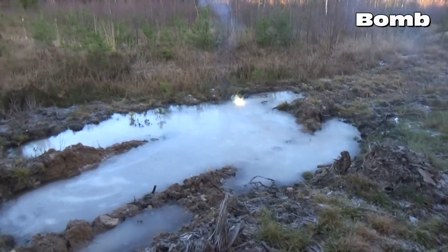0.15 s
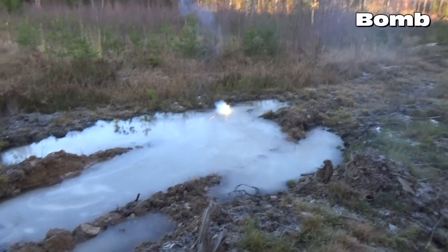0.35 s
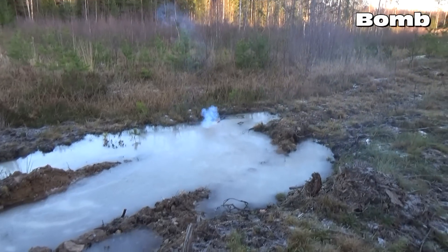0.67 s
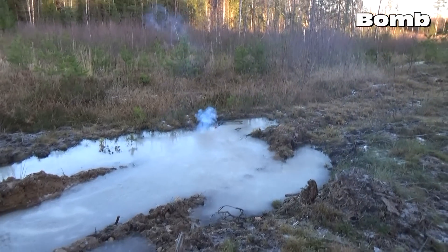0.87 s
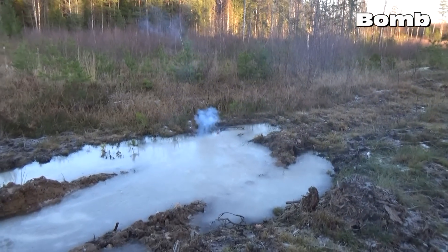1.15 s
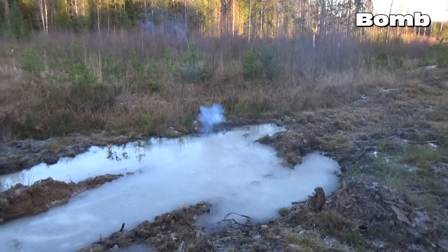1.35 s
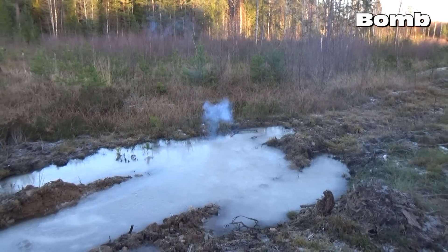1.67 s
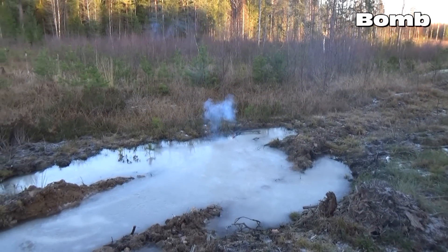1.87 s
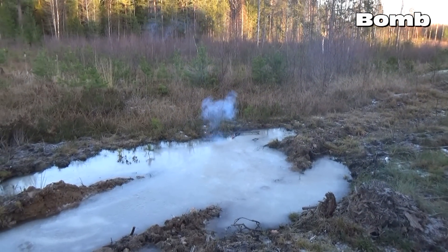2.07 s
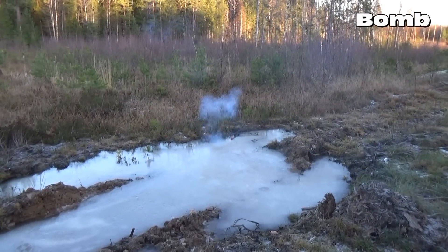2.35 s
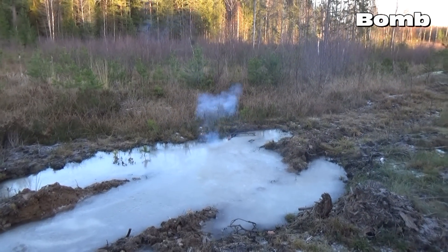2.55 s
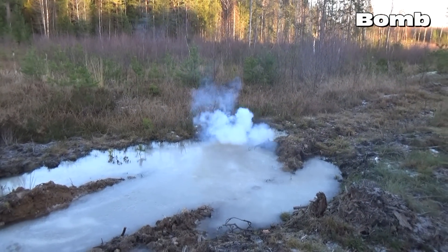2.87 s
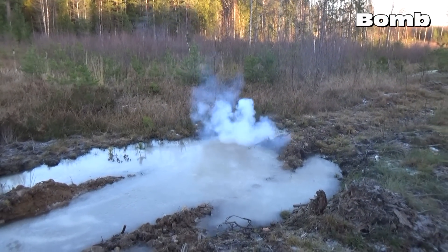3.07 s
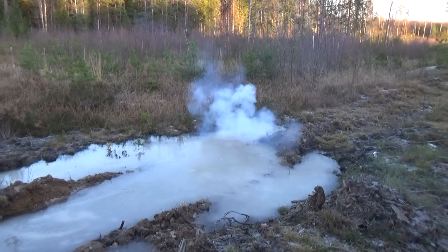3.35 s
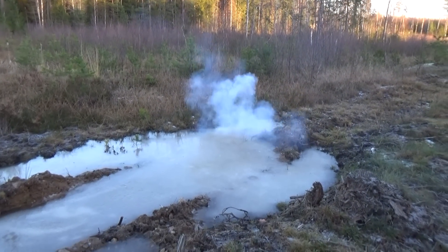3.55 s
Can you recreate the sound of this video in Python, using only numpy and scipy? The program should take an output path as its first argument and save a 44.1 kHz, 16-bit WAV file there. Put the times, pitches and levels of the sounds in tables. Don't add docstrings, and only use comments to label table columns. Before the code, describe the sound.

A firecracker sputters brightly at 0 s, quietens, then puffs low around 0.4 s. A sharp snap at 0.8 s starts a thin, high, flickering hiss, swelling near 2 s and easing, with a small pop at 2.45 s. At 2.75 s a very loud, distorted bang hits with a falling icy boom; crackle and a lumpy, left-drifting forest roll from 3 s sink until the end at 3.7 s.

```python
import sys
import numpy as np
from scipy import signal
from scipy.fft import rfft, irfft
from scipy.io import wavfile
from scipy.ndimage import uniform_filter1d

SR = 44100
rng = np.random.default_rng(int(sys.argv[2]) if len(sys.argv) > 2 else 0)


def persist_wave(psi):
    counts = np.round(np.clip(psi, -1, 1) * 32767).astype(np.int16)
    wavfile.write(sys.argv[1], SR, np.atleast_2d(counts).T)


def attenuation_scalar(level_db):
    decades = np.asarray(level_db, float) / 20
    return 10 ** decades


N = 163170

SHOCK_S, SHOCK_WIDTH_S, SHOCK_DB = 2.7502, 0.0003, 2
CRACK_DB, CRACK_S = 4, 0.0067
# frequency in Hz, likeness from 0 to 1.
BANG_LIKENESS = [(60, 0.72), (180, 0.65), (550, 1), (1650, 0.97), (4970, 0.78), (15000, 0.52)]
# frequency in Hz, level in dB per Hz.
DEBRIS_COLOUR = [(100, 13), (400, -12), (1500, 2), (4000, -5), (8000, -4.5), (15500, -16.5)]
# frequency in Hz, T60 in seconds.
DEBRIS_T60 = [(200, 1.05), (1500, 3), (5000, 1.76), (10000, 0.76), (15000, 0.67)]
DEBRIS_DB, DEBRIS_HOLD_S = -3, 0.1
BANK_S, BANK_WIDTH_S, BANK_DB = 2.868, 0.022, 3
# frequency in Hz, level in dB per Hz.
FOREST_COLOUR = [(47, -34), (80, -8), (107, -18), (185, -13.5), (754, -4.5), (1080, -8), (1330, -6),
                 (2200, -11.5), (6530, -31), (12000, -46.5), (15600, -74)]
# frequency in Hz, T60 in seconds.
FOREST_T60 = [(100, 3.1), (300, 140), (700, 7.3), (2000, 3.35), (5000, 1.8), (10000, 3)]
FOREST_S, FOREST_RISE_DB_PER_S, FOREST_DB = 2.986, 41, 2
FOREST_PAN_DB, FOREST_PAN_DB_PER_S = 1.5, 13
# time in seconds, level in dB.
ROLL_LEVEL = [
    (2.96, -15.5),
    (3.144, -4),
    (3.206, -11),
    (3.342, -8),
    (3.356, -9.5),
    (3.542, -10),
    (3.55, -10),
    (3.686, -13.5),
    (3.7, -11),
]
# time in seconds, width in seconds, lift in dB.
TREE_ECHOES = [(3.02, 0.011, 1.5), (3.055, 0.014, 5.5), (3.12, .02, 1), (3.16, .015, 0.5), (3.235, .012, 2),
               (3.28, 0.014, 2.5), (3.325, .02, 3), (3.44, .012, 1), (3.49, 0.013, 2), (3.53, .014, 1),
               (3.61, .01, 1.5), (3.667, 0.014, 4)]

# start in seconds, length in seconds, pitch in Hz,
# level in dB.
ICE_WAVES = [(2.727, 0.0084, 1250, -20), (2.7385, 0.007, 680, 3), (2.739, 0.0043, 1180, 1),
             (2.7465, 0.0065, 805, -5), (2.7435, 0.0071, 2500, -3.5), (2.7425, 0.0062, 160, -7),
             (2.743, 0.0076, 1540, -2.5), (2.751, 0.06, 305.5, 2), (2.778, 0.038, 245.4, -2),
             (2.80, 0.051, 196, 0.5), (2.81, 0.046, 151, -6), (2.815, 0.105, 307.3, -9),
             (2.77, 0.044, 133, -5), (2.885, 0.073, 190.4, -2), (2.90, 0.054, 124, -3.5),
             (2.968, 0.052, 118, -8), (3.055, 0.087, 110.3, -3.5), (3.11, 0.037, 123, -11),
             (3.17, 0.038, 108, -9.5), (3.27, 0.061, 104, -14.5), (3.33, .035, 110, -21),
             (3.385, 0.065, 112, -15)]
ICE_SAG, ICE_WOBBLE, ICE_FLUTTER_DB = 0.15, 0.11, 2
ICE_PAN_DB, ICE_LAG_RAD, PAN_FULL_HZ = 11, 0.81, 170
GRIT_S, GRIT_DB = 2.739, -11.5
# frequency in Hz, level in dB per Hz.
RUMBLE_COLOUR = [(40, -20), (80, -5), (130, 0.5), (220, -3), (350, -9), (600, -21), (2000, -57)]
# frequency in Hz, T60 in seconds.
RUMBLE_T60 = [(60, 1.8), (110, 1.6), (200, 0.82), (400, .6)]
# frequency in Hz, likeness from 0 to 1.
RUMBLE_LIKENESS = [(80, .85), (200, .3), (500, 0.44)]
# frequency in Hz, left over right in dB.
RUMBLE_PAN = [(60, -1.5), (110, 3), (200, 15), (500, 11)]
RUMBLE_DB, RUMBLE_HOLD_S = -9.5, 0.14

# time in seconds, burn level in dB, body of the jet in dB.
BURN = [(0.0, -16.5, -16), (0.13, -29, -9.5), (0.3, -31, -5.5), (0.41, -23.5, -16.5), (0.62, -45, 2),
        (0.69, -37.5, 3), (0.7, -42.5, 6.5), (0.79, -23, -18), (1.1, -15.5, -20.5), (1.23, -18, -18),
        (1.61, -12.5, -16.5), (1.69, -15, -14.5), (2.01, -14.5, -14), (2.04, -10, -18.5),
        (2.07, -13.5, -14.5), (2.58, -22, -16), (2.6, -18, -20), (2.74, -22, -18)]
# frequency in Hz, level in dB per Hz.
HISS_COLOUR = [(2350, -30.5), (4000, -13.5), (5200, -12), (6050, -6.5), (7760, -1), (9450, 0.5),
               (10800, -2), (12000, -7.5), (15500, -14)]
# frequency in Hz, level in dB per Hz.
BODY_COLOUR = [(700, -25), (1200, 4), (1700, 4), (2300, 2.5), (3000, 6.5), (3800, -2), (4700, 1.5),
               (8000, -23)]
# frequency in Hz, level in dB per Hz.
SPUTTER_COLOUR = [(2000, -21), (4500, -1.5), (9000, -10), (13000, 4.5), (16000, -2)]
# frequency in Hz, likeness from 0 to 1.
FUSE_LIKENESS = [(60, 0.78), (180, 0.58), (550, 0.03), (1650, 1), (4970, 0.76), (15000, 0.83)]
SPIT_DB, SPITS_PER_S, SPIT_SPREAD_DB, SPIT_T60_S = -8, 1500, 3.5, 0.0015
SPUTTER_END_S, SPUTTER_DB = 0.078, -3
# time in seconds, level in dB.
FLARE_LEVEL = [
    (.09, -38),
    (0.27, -33),
    (0.342, -24.5),
    (0.388, -11.5),
    (0.436, -8.5),
    (0.5, -33),
    (.64, -40),
]
# frequency in Hz, level in dB per Hz.
FLARE_COLOUR = [(35, -35), (100, -6), (240, -3.5), (735, -11.5), (1060, -14), (1780, -14.5), (3850, -31),
                (6000, -32), (7800, -61), (13200, -120)]
# frequency in Hz, T60 in seconds.
FLARE_T60 = [(800, 6.1), (1500, 0.53), (3000, .3)]
FLARE_DULL_S, FIRST_PUFF_DB, FIRST_PUFF_S = 0.39, -26.5, 0.063

# pitch in Hz, level in dB, T60 in seconds.
SNAP_MODES = [(1250, -8.5, 0.013), (1850, -4, 0.014), (2500, 1.5, 0.0073), (3040, 1.5, 0.0085),
              (3720, -6.5, .012), (4450, -5.5, 0.0092), (4950, -13, .008), (7630, -1, .006),
              (8540, -8, .006)]
SNAP_S, SNAP_DB = 0.7929, -2
# time in seconds, peak in dB, pitch in Hz.
POPS = [
    (.0004, -16, 1290),
    (.0672, -18, 1400),
    (0.078, -20, 1880),
    (.2064, -27, 1410),
    (.3197, -24, 1330),
    (0.44, -19, 1490),
    (2.4583, -19, 1700),
    (2.458, -24, 3700),
]
POP_T60_S, POP_DB = 0.0032, 9.5
# time in seconds, peak in dB, pitch in Hz.
TICKS = [(0.0064, -8, 10800), (0.0274, -11, 9450), (0.0354, 5, 12800), (0.055, 2, 13200),
         (0.0584, -2, 10200), (0.2104, -14, 10300), (3.237, -23, 12000), (3.2615, -24, 11500),
         (3.5524, -38, 10800), (3.5618, -31, 13100), (3.6137, -35, 11200), (3.677, -32, 11000)]
TICK_T60_S, TICK_DB = 0.0022, 7

# frequency in Hz, level in dB per Hz.
AIR_COLOUR = [(15, -38), (25, 0), (59, -30), (97, 10.5), (124, -13.5), (157, -3.5), (422, -16), (753, -9.5),
              (1300, -14.5), (1690, -32), (2860, -120)]
# frequency in Hz, likeness from 0 to 1.
AIR_LIKENESS = [(60, 1), (130, 0.7), (300, 0.22), (700, 0.065), (1500, 0.83), (8000, 0.4)]
# frequency in Hz, left over right in dB.
AIR_PAN = [(60, -5.5), (150, 6.5), (400, 14), (1500, 11.5)]
# frequency in Hz, level in dB per Hz.
MIC_COLOUR = [(1150, -13), (1600, 0.5), (2500, -10), (5000, -5), (9000, 1.5), (15500, 0.5)]
AIR_DB, MIC_DB = -30.5, -31
DUCK_DB, BREEZE_BACK_DB = -22, 16
GAIN_RIDE, GAIN_RIDE_FROM_DB = 0.12, -26
# frequency in Hz, gain in dB.
GROUND_NOTCH = [(950, 0), (1200, -7), (1500, 0)]
LOW_CUT_HZ, EDGE_HZ, KNEE = 105.6, 15700, 8


def evened(x):
    return x / np.sqrt(np.mean(x ** 2) + 1e-20)


def read(points, hz):
    f, value = np.transpose(points)
    return np.interp(np.log(hz + 1), np.log(f + 1), value)


def pan(db):
    half = db / 2 * np.ones(1)
    return attenuation_scalar(np.array([half, -half]))


def flicker(seconds):
    width = max(int(seconds * SR), 2)
    return evened(uniform_filter1d(uniform_filter1d(rng.standard_normal(N), width), width))


def noise(colour, same, patchy_db, t60=None, start=0., pan_db=((1, 0),), size=512):
    hop = size // 4
    frames, hz = N // hop + 5, np.fft.rfftfreq(size, 1 / SR)
    a, b, c, d, patches = rng.standard_normal((frames, len(hz), 5)).T
    patches = evened(uniform_filter1d(uniform_filter1d(patches, size // 100, 0), 2500 // hop, 1))
    like = np.clip(read(same, hz), -1, 1)[:, None]
    left = a + 1j * b
    right = like * left + np.sqrt(1 - like ** 2) * (c + 1j * d)
    z = np.array([left, right]) * attenuation_scalar(read(colour, hz)[:, None] + patchy_db * patches)
    z = z * pan(read(pan_db, hz))[..., None]
    scale = np.sqrt(np.mean(signal.istft(z, nperseg=size, noverlap=size - hop)[1] ** 2))
    if t60 is not None:
        age = np.maximum(np.arange(frames) * hop / SR - start, 0)
        z = z * attenuation_scalar(-60 * age / np.maximum(read(t60, hz), .1)[:, None])
    return signal.istft(z, nperseg=size, noverlap=size - hop)[1][:, :N] / scale


def ring(hz, t60):
    t = np.arange(1200) / SR
    return np.sin(2 * np.pi * hz * t) * attenuation_scalar(-60 * t / t60) * np.minimum(t / 0.00037, 1)


def place(out, start_s, sound):
    at = round(start_s * SR)
    out[at:at + 1200] += sound


def blast(t):
    u = np.maximum(t - SHOCK_S, 0)
    shock = attenuation_scalar(SHOCK_DB) * (1 - u / SHOCK_WIDTH_S) * np.exp(-u / SHOCK_WIDTH_S)
    crack = noise([(500, 0.5), (2000, -1), (9000, 1), (16000, -5)], BANG_LIKENESS, 1.5)
    crack = crack * attenuation_scalar(CRACK_DB) * np.exp(-(u / CRACK_S) ** 2)
    return (shock + crack + debris(t) + tree_roll(t)) * (t >= SHOCK_S)


def debris(t):
    crackle = noise(DEBRIS_COLOUR, BANG_LIKENESS, 0.74, DEBRIS_T60, SHOCK_S + DEBRIS_HOLD_S)
    rough_db = 1.83 * flicker(0.002) + 0.83 * flicker(0.0073) + 0.3 * flicker(0.027)
    bank_db = BANK_DB * np.exp(-((t - BANK_S) / BANK_WIDTH_S) ** 2)
    return crackle * attenuation_scalar(DEBRIS_DB + rough_db + bank_db) * pan(2.7)


def tree_roll(t):
    trees = noise(FOREST_COLOUR + [(20000, -76)], BANG_LIKENESS, 1.6, FOREST_T60, FOREST_S)
    s, db = np.transpose(ROLL_LEVEL)
    level_db = FOREST_DB + np.interp(t, s, db) + FOREST_RISE_DB_PER_S * np.minimum(t - FOREST_S, 0)
    echoes_db = sum(lift * np.exp(-((t - at) / width) ** 2) for at, width, lift in TREE_ECHOES)
    rough_db = 1.5 * flicker(0.004) + 1.8 * flicker(0.013)
    drift = pan(FOREST_PAN_DB + FOREST_PAN_DB_PER_S * np.maximum(t - FOREST_S, 0))
    return trees * attenuation_scalar(level_db + echoes_db + rough_db) * drift


def ice(t):
    out = np.zeros((2, N))
    wobble, flutter = flicker(0.0021), attenuation_scalar(ICE_FLUTTER_DB * flicker(0.0067))
    for k, (start, length, hz, db) in enumerate(ICE_WAVES):
        part = slice(round(start * SR), round((start + length) * SR))
        u = np.clip((t[part] - start) / length, 0, 1)
        pitch = hz * (1 - ICE_SAG * u + ICE_WOBBLE * np.roll(wobble, 999 * k)[part])
        turns = 2 * np.pi * np.cumsum(pitch) / SR
        shape = attenuation_scalar(db) * np.sqrt(abs(np.sin(np.pi * u ** 0.7))) * np.roll(flutter, 999 * k)[part]
        side = pan(ICE_PAN_DB * (start > SHOCK_S) * np.clip(hz / PAN_FULL_HZ, 0, 1) ** 2)
        lag = np.array([[0], [ICE_LAG_RAD * np.clip(hz / 200, 0, 1) ** 2]])
        out[:, part] -= shape * side * np.sin(turns - lag)
    grit = noise([(800, -8), (2500, -1), (6000, -6), (15000, -13)], BANG_LIKENESS, 1.6)
    grit = grit * attenuation_scalar(GRIT_DB + 3.0 * flicker(0.0011))
    return out + grit * (t > GRIT_S) * (t < SHOCK_S)


def rumble(t):
    lumps = noise(RUMBLE_COLOUR, RUMBLE_LIKENESS, 2.6, RUMBLE_T60, SHOCK_S + RUMBLE_HOLD_S, RUMBLE_PAN,
                  size=1024)
    return lumps * attenuation_scalar(RUMBLE_DB + 2.5 * flicker(0.012)) * np.clip((t - SHOCK_S) / 0.006, 0, 1)


def fuse(t):
    s, burn_db, body_db = np.transpose(BURN)
    jet = noise(HISS_COLOUR + [(22000, -44)], FUSE_LIKENESS, 1.4)
    jet = jet * attenuation_scalar(1.4 * flicker(0.0016) + 0.58 * flicker(0.017) + 0.62 * flicker(0.042))
    sputter = noise(SPUTTER_COLOUR, FUSE_LIKENESS, 2.4) * attenuation_scalar(SPUTTER_DB + 7.3 * flicker(0.0031))
    sputter = sputter * np.clip((SPUTTER_END_S - t) / 0.0064, 0, 1)
    body = noise(BODY_COLOUR, FUSE_LIKENESS, 0.56)
    body = body * attenuation_scalar(np.interp(t, s, body_db) + 1.0 * flicker(0.0038))
    burning = jet + sputter + body + evened(spits()) * attenuation_scalar(SPIT_DB)
    return burning * pan(1.15) * attenuation_scalar(np.interp(t, s, burn_db)) * (t < SHOCK_S)


def spits():
    size = attenuation_scalar(SPIT_SPREAD_DB * np.minimum(rng.exponential(1, N), 3))
    size = size * (rng.random(N) < SPITS_PER_S / SR)
    kind = rng.integers(0, 12, N)
    out = np.zeros(N)
    for k, hz in enumerate(np.geomspace(6000, 14000, num=12)):
        bursts = signal.oaconvolve(size * (kind == k), ring(hz, SPIT_T60_S))[:N]
        out += attenuation_scalar(read(HISS_COLOUR, hz) / 2) * bursts
    return out


def flare(t):
    s, db = np.transpose(FLARE_LEVEL)
    level = attenuation_scalar(np.interp(t, s, db, left=-90, right=-90)) + attenuation_scalar(FIRST_PUFF_DB) * (t < FIRST_PUFF_S)
    puff = noise(FLARE_COLOUR + [(12000, -55)], [(1, 0.92)], 1.6, FLARE_T60, FLARE_DULL_S)
    return puff * attenuation_scalar(1.7 * flicker(0.0024)) * uniform_filter1d(level, 200) * pan(0.7)


def snaps_and_ticks():
    out = np.zeros(N + 1200)
    for k, (hz, db, t60) in enumerate(SNAP_MODES):
        place(out, SNAP_S, (-1) ** k * attenuation_scalar(SNAP_DB + db) * ring(hz, t60))
    for s, db, hz in POPS:
        for pitch, share in [(hz, 1), (1.5 * hz, 0.63), (0.89 * hz, 0.49), (8400, 0.55)]:
            place(out, s, attenuation_scalar(db + POP_DB) * share * ring(pitch, POP_T60_S))
    for s, db, hz in TICKS:
        for ratio, share in [(1, 1), (0.8, 0.6), (1.2, 0.6)]:
            place(out, s, attenuation_scalar(db + TICK_DB) * share * ring(ratio * hz, TICK_T60_S))
    return out[:N]


def quiet_air(t):
    breeze = attenuation_scalar(AIR_DB) * noise(AIR_COLOUR, AIR_LIKENESS, 0.63, pan_db=AIR_PAN, size=2048)
    breeze = breeze * attenuation_scalar(BREEZE_BACK_DB * (t > SHOCK_S))
    hiss = attenuation_scalar(MIC_DB) * noise(MIC_COLOUR, AIR_LIKENESS, 1.2)
    s, burn_db, _ = np.transpose(BURN)
    excess_db = np.maximum(np.interp(t, s, burn_db) - GAIN_RIDE_FROM_DB, 0) * (t > SNAP_S)
    ride_db = -GAIN_RIDE * uniform_filter1d(excess_db, size=9000)
    return (breeze + hiss) * attenuation_scalar(np.where(t < SHOCK_S, ride_db, DUCK_DB))


def ground_notch(x):
    return irfft(rfft(x) * attenuation_scalar(read(GROUND_NOTCH, np.fft.rfftfreq(N, 1 / SR))), N)


def low_cut(x):
    return signal.sosfilt(signal.butter(4, LOW_CUT_HZ, "high", fs=SR, output="sos"), x)


def scene():
    t = np.arange(N) / SR
    heavy = low_cut(blast(t) + ice(t) + rumble(t) + flare(t))
    return heavy + ground_notch(fuse(t) + quiet_air(t)) + snaps_and_ticks()


def top_cut(x):
    return signal.sosfilt(signal.butter(12, 15620, fs=SR, output="sos"), x)


def record(dry):
    clipped = dry / (1 + abs(dry / 0.87) ** KNEE) ** (1 / KNEE)
    limited = signal.oaconvolve(clipped, signal.firwin(255, EDGE_HZ, fs=SR)[None], "same")
    return top_cut(limited)


dry = scene()
out = record(dry)
persist_wave(out)
```